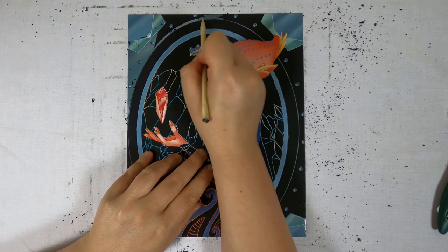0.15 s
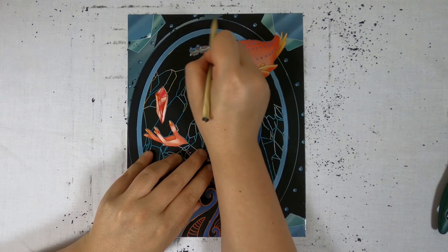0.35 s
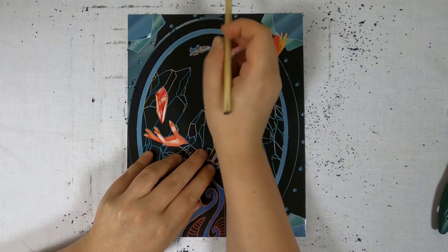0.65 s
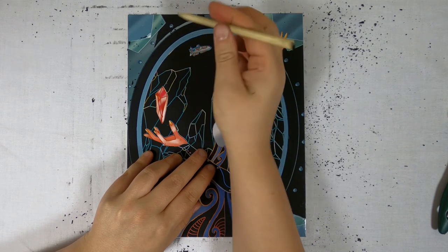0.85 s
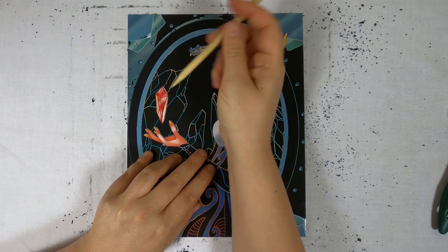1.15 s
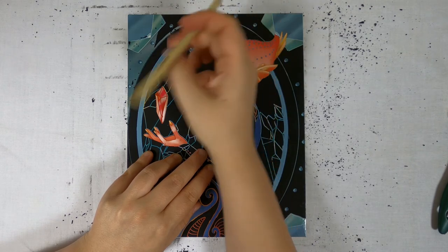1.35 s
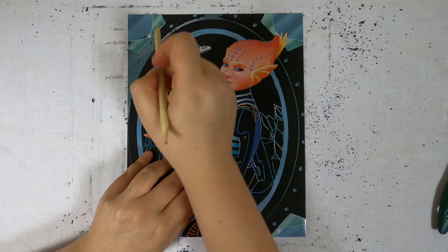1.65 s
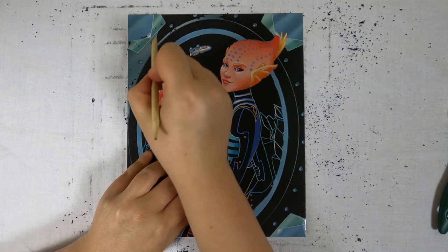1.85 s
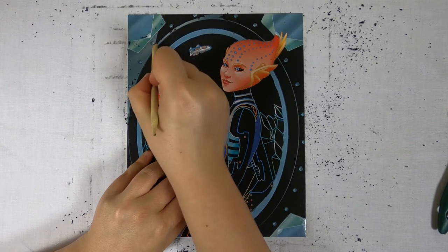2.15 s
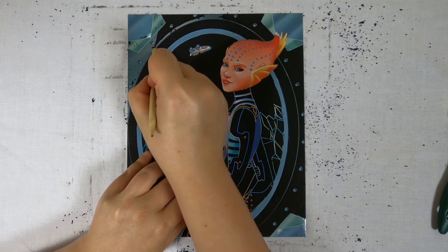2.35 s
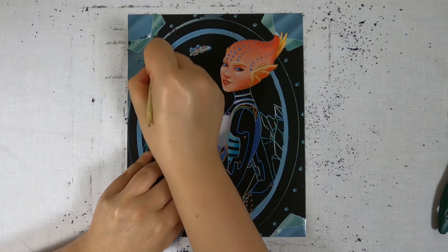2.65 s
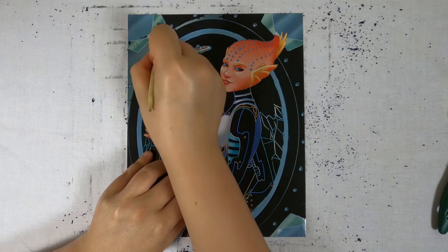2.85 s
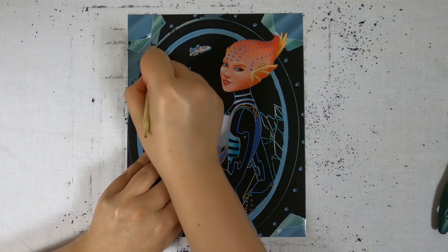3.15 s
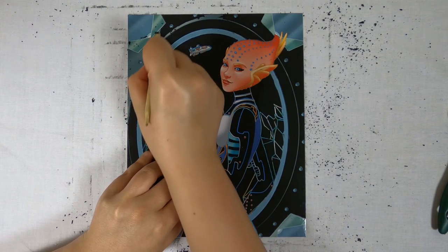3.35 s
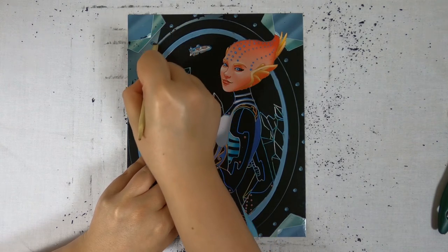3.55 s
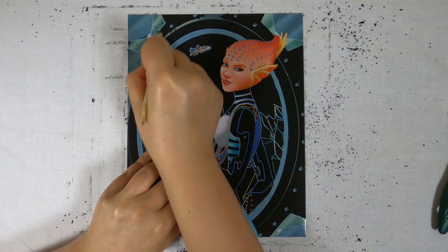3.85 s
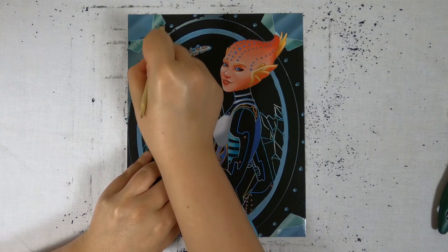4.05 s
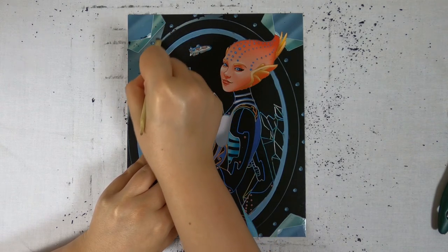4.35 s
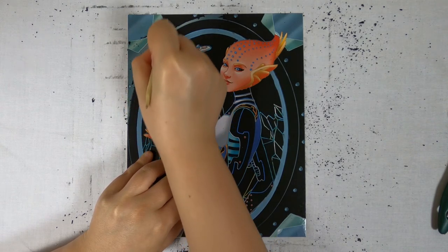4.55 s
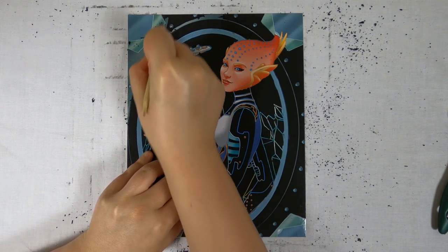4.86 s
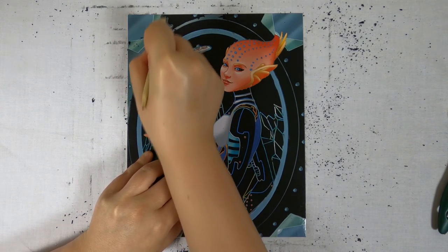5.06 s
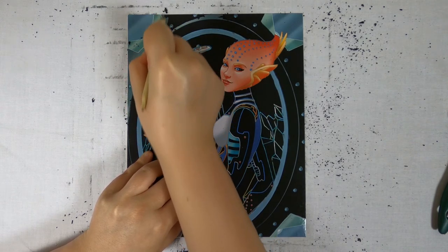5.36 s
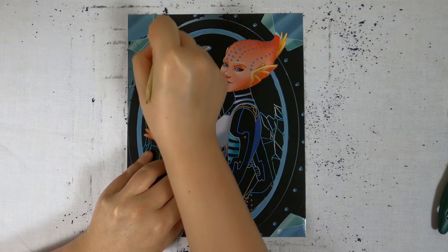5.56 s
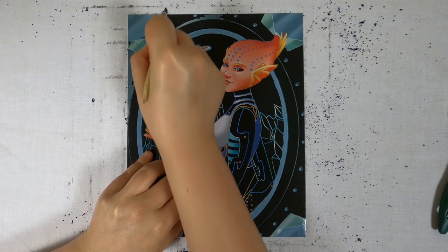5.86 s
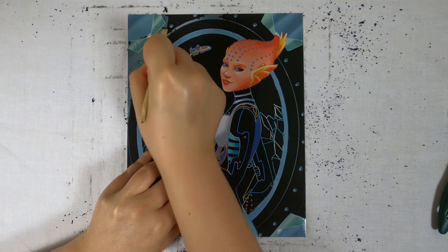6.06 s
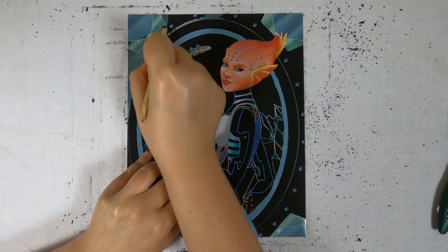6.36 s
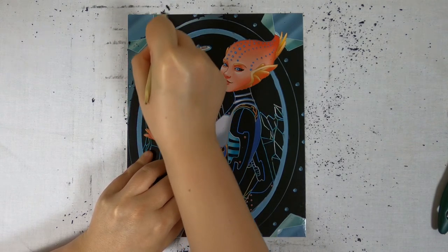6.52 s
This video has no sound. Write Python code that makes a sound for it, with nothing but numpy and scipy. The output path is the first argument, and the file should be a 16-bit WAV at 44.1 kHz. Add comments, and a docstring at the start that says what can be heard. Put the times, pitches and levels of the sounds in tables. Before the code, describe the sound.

A wooden stylus works on a scratch card, heard from close by and a little to the left, over the faint low rush of a quiet room. Two light, thin scratches come at about 0.2 and 0.4 seconds. From 0.5 to 2 seconds there is only a faint sliding of skin and the swish of the shaft shifting between fingers. The tip lands with a tick at 2.4 seconds. Three longer, much louder rasping scrapes follow at about 2.6, 3.8 and 4.5 seconds, with small clicks, fine crackle and a resonance from card and tabletop; the last two carry a brief rough squeak. From 5 to 6.3 seconds five short strokes come about three a second, then a couple of faint ones. The hand brushes to and fro over the card throughout the scraping and bumps the table softly as strokes stop, most clearly near 5 and 6 seconds.

```python
"""A quiet room, stereo microphones close to a table where a wooden stylus scrapes a scratch card.
The tip sticks and slips on the coating and sets card and tabletop ringing; the hand brushes to and fro
over the card. After two light strokes the fingers shift their grip, then come three long hard strokes
and a run of short ones, the hand bumping the table as they stop."""
import sys
import numpy as np
from scipy import signal
from scipy.fft import rfft, irfft
from scipy.io import wavfile
from scipy.ndimage import uniform_filter1d

SR = 44100
rng = np.random.default_rng(int(sys.argv[2]) if len(sys.argv) > 2 else 0)


def waveform_to_disk(signal):
    """Save audio, clipped to [-1, 1], as 16-bit WAV at the path in sys.argv[1]."""
    frames = np.transpose(np.atleast_2d(signal))
    scaled = np.clip(frames, -1, 1) * 32767
    samples = np.round(scaled).astype(np.int16)
    wavfile.write(sys.argv[1], SR, samples)


N = 295029
TIME = np.arange(N) / SR
RING_SIZE = 16384  # samples in an impulse response


def from_db(db):
    """Decibels to gain."""
    return 10 ** (np.asarray(db) / 20)


def energy_one(response):
    """Scale a stereo response so that its centre passes white noise at the same level."""
    return response / np.sqrt(np.sum(response.mean(axis=0) ** 2) + 1e-30)


def peak_one(response):
    """Scale a stereo response so that its centre peaks at 1."""
    return response / np.abs(response.mean(axis=0)).max()


def at_hz(points, hz):
    """Read a table on a log-frequency axis."""
    table = np.array(points)
    return np.interp(np.log(np.maximum(hz, 1)), np.log(table[:, 0]), table[:, 1])


def band(x, low_hz, high_hz, order=2):
    """Causal band-pass."""
    return signal.sosfilt(signal.butter(order, [low_hz, high_hz], "band", fs=SR, output="sos"), x)


def drift(per_s):
    """A random wander of spread 1 that takes a new course per_s times a second."""
    knots = rng.standard_normal(N // 20)
    return np.interp(TIME * per_s, np.arange(len(knots)), knots) * np.sqrt(3 / 2)


def minimum_phase(gain):
    """The spectrum of a causal filter with these gains: nothing sounds before its cause."""
    cepstrum = irfft(np.log(gain), RING_SIZE)
    cepstrum[1:RING_SIZE // 2] *= 2
    cepstrum[RING_SIZE // 2 + 1:] = 0
    return np.exp(rfft(cepstrum))


def colour(pair, spectrum, likeness, balance):
    """Two unrelated signals become left and right with a spectrum, likeness and balance; centre rms 1."""
    hz = np.arange(RING_SIZE // 2 + 1) * SR / RING_SIZE
    alike = np.clip(at_hz(likeness, hz), 0, .99)
    channels = []
    for sign in (1, -1):
        gain = from_db(at_hz(spectrum, hz) + sign * at_hz(balance, hz) / 2)
        filters = irfft([minimum_phase(gain * np.sqrt(share)) for share in (1 + alike, 1 - alike)])
        mid, side = signal.oaconvolve(pair, filters, axes=1)[:, :pair.shape[-1]]
        channels.append(mid + sign * side)
    return np.array(channels) / np.std(np.mean(channels, axis=0))


def play(force, response):
    """A force drives a stereo response."""
    return signal.oaconvolve(force[None], response, axes=1)[:, :N]


def blows(times_s, levels_db):
    """A force with one click for each blow."""
    force = np.zeros(N)
    force[(np.asarray(times_s) * SR).astype(int)] = from_db(levels_db)
    return force


def pressing(rows, release_db_per_s, sag_db_per_s=0, bite_s=0.013, bite_rise_db=17):
    """The gain of pushes (start_s, length_s, level_db): a quick bite, a hold that may sag, a release."""
    gain = np.zeros(N)
    for start, length, level_db in rows:
        t = TIME - start
        bite = bite_rise_db * np.minimum(t / bite_s - .5, 0)
        sag = sag_db_per_s * np.clip(t, 0, length)
        release = release_db_per_s * np.maximum(t - length, 0)
        db = level_db + bite - sag - release
        heard = db > -130
        gain[heard] = np.maximum(gain[heard], from_db(db[heard]))
    return gain


# Room tone (levels in all tables are relative): frequency_hz, level_db
AIR_SPECTRUM = [(20, -10), (35, -7.5), (60, -15), (100, -35), (135, -11), (190, -7.5), (270, -15.5),
                (400, -20.5), (750, -26.5), (1100, -23.5), (2000, -29), (4000, -37), (10000, -45),
                (15500, -47.5)]
# How alike the room is at the two microphones: frequency_hz, likeness_0_to_1
AIR_LIKENESS = [(30, 0.66), (200, 0.27), (600, 0.2), (2000, 0), (15000, 0.054)]
# Where the room tone leans: frequency_hz, left_minus_right_db
AIR_BALANCE = [(60, 0.5), (110, -2.5), (200, -2.5), (380, -7), (700, -6.5), (1290, -2), (2380, -3),
               (4400, 4.5), (8120, 1), (15000, -6)]


def room_tone(level_db):
    """The air all around the microphones: a steady, faint, low rush."""
    return from_db(level_db) * colour(rng.standard_normal((2, N)), AIR_SPECTRUM, AIR_LIKENESS, AIR_BALANCE)


# Decay of the room: frequency_hz, t60_s
ROOM_DECAY = [(120, 0.23), (320, 0.26), (900, 0.17), (2500, 0.17), (6000, 0.15), (14000, 0.23)]


def room(direct, wet_db, first_echo_s):
    """Nearby walls add a diffuse tail that dies band by band and is most alike left and right in the bass."""
    t = TIME[:RING_SIZE]
    spectrum = [(100, -10.5), (1000, 4.5), (15000, -1.5)]  # frequency_hz, level_db
    noise = colour(rng.standard_normal((2, RING_SIZE)), spectrum, AIR_LIKENESS, HAND_BALANCE)
    edges_hz = np.geomspace(80, 17000, 8)
    tail = np.zeros_like(noise)
    for low, high in zip(edges_hz, edges_hz[1:]):
        t60_s = at_hz(ROOM_DECAY, np.sqrt(low * high))
        tail += band(noise, low, high) * from_db(-60 * t / t60_s)
    tail = energy_one(tail * (t > first_echo_s))
    return direct + from_db(wet_db) * signal.oaconvolve(direct, tail, axes=1)[:, :N]


def microphones(sound, left_lag_s):
    """The lows reach the left microphone a moment later; the treble arrives from all around."""
    left, right = sound
    lows = signal.sosfilt(signal.butter(1, 3000, fs=SR, output="sos"), left)
    late_lows = np.interp(TIME - left_lag_s, TIME, lows)
    return np.array([left - lows + late_lows, right])


# How alike the hand is at the two microphones: frequency_hz, likeness_0_to_1
HAND_LIKENESS = [(100, 0.83), (600, 0.85), (1400, 0.86), (3000, 0.45), (7000, 0.47), (15000, 0.11)]
# Where the hand sits between them: frequency_hz, left_minus_right_db
HAND_BALANCE = [(380, -2.5), (1300, 3), (2400, 8.5), (4400, 10.5), (8000, 2), (15000, -4.5)]
# Dry skin on coated card: frequency_hz, level_db
SKIN_HISS = [(700, -23.5), (1500, -4), (2900, -3), (3700, 2), (4600, -0.5), (6500, -2.5), (9300, -8.5),
             (10500, -16), (13000, -17.5), (16000, -34.5)]


def friction(spectrum=SKIN_HISS, grain_db=0.0):
    """Sliding noise from where the hand is; a fast flutter in level gives it a fine grain."""
    grain = from_db(grain_db * drift(900))
    return colour(rng.standard_normal((2, N)) * grain, spectrum, HAND_LIKENESS, HAND_BALANCE)


# The lifted hand and arm sliding: time_s, level_db
ARM_SLIDE = [(0.53, -78.5), (0.738, -77.5), (0.884, -67), (0.932, -81), (1.066, -75), (1.124, -90.5),
             (1.722, -77.5), (2.1, -91)]
# The shaft slipping through the fingers: centre_s, length_s, level_db
GRIP_SLIPS = [(0.72, 0.061, -75), (1.06, 0.037, -74), (1.242, 0.038, -70), (1.452, 0.05, -69.5),
              (1.521, 0.028, -60), (1.635, 0.033, -75), (1.71, 0.053, -72.5), (1.793, 0.045, -69.5)]
# Fingers on the wooden shaft: frequency_hz, level_db
GRIP_SPECTRUM = [(1000, -22), (3300, -24), (4300, -27), (5600, -13), (6300, 5), (7100, -12), (8500, -17),
                 (9900, -6.5), (11000, -22), (16000, -25)]


def regripping(slide_db, grip_db, rustle_db):
    """The arm slides away unevenly and the shaft swishes between the fingers, whose skin rustles with it."""
    times_s, levels_db = np.transpose(ARM_SLIDE)
    arm_db = np.interp(TIME, times_s, levels_db + slide_db, left=-140, right=-140)
    slide = from_db(arm_db + 2.0 * drift(30.2))
    slipping = sum(from_db(db) * np.exp(-(2 * (TIME - centre) / length) ** 2)
                   for centre, length, db in GRIP_SLIPS)
    skin = (slide + from_db(rustle_db) * slipping) * friction(SKIN_HISS, grain_db=2.5)
    shaft = from_db(grip_db) * slipping * friction(GRIP_SPECTRUM)
    return skin + shaft


def scrubs(count, first_s, period_s, growth_db, back_s=0.13, forth_s=0.14):
    """Rows like HAND_SWEEPS for steady scrubbing: back, forth, a short rest, a little harder each time."""
    rows = []
    for k in range(count):
        start, harder_db = first_s + k * period_s, k * growth_db
        rows.append((start, back_s, -76 + harder_db, -70 + harder_db))
        rows.append((start + back_s, forth_s, -74.5 + harder_db, -65 + harder_db))
    return rows


# Single sweeps of the hand over the card: start_s, length_s, hiss_db, rub_db
HAND_SWEEPS = [(-0.02, 0.12, -81, -66), (0.13, 0.11, -79, -68.5), (0.239, 0.14, -84, -69),
               (0.419, 0.083, -68.5, -70.5), (2.475, .138, -81.5, -73), (2.58, 0.36, -75.5, -58.5),
               (2.935, 0.2, -69.5, -72.5), (3.319, 0.16, -77.5, -67.5), (3.484, .174, -80.5, -84),
               (3.736, 0.37, -79, -59.5), (4.102, 0.2, -76.5, -89), (4.394, 0.3, -71, -60.5)]
# The card answering the rubbing hand: frequency_hz, level_db
RUB_SPECTRUM = [(60, -26), (150, 9), (320, 12), (460, 6.5), (600, -4.5), (800, -5.5), (1000, 3),
                (1200, 0.5), (1370, 3.5), (1600, -0.5), (2100, -8), (2400, 2), (3000, -32), (6000, -35.5)]


def brushing(hiss_gain_db, rub_gain_db, hiss_power, rub_power, stick_share):
    """In each sweep the hand speeds up and slows down again; friction noise follows its speed."""
    hiss, rub = np.zeros((2, N))
    sweeps = HAND_SWEEPS + scrubs(count=7, first_s=4.764, period_s=0.312, growth_db=0.56)
    for start, length, hiss_db, rub_db in sweeps:
        during = (TIME > start) & (TIME < start + length)
        speed = np.abs(np.sin(np.pi * (TIME[during] - start) / length))
        sliding = np.maximum(speed - stick_share, 1e-6)  # near the turn the skin sticks and the hiss stops
        hiss[during] += from_db(hiss_db + hiss_gain_db) * sliding ** hiss_power
        rub[during] += from_db(rub_db + rub_gain_db) * speed ** rub_power
    pressure = from_db(0.85 * drift(49))
    skin = hiss * friction(SKIN_HISS, grain_db=2.0)
    body = rub * friction(RUB_SPECTRUM, grain_db=1.5)
    return pressure * (skin + body)


# Modes of card and tabletop: pitch_hz, level_db, t60_s
CARD_MODES = [(143.1, -9, 0.18), (173.4, -11, 0.21), (196.6, -9.5, 0.33), (278.5, -5.5, 0.31),
              (300.3, 1, 0.15), (337, -6, 0.096), (365.2, -5.5, 0.23), (437, -16, 0.17), (444.9, -5, 0.17),
              (543.4, -18, 0.12), (658, -16.5, 0.12), (742.4, -11.5, 0.19), (803, -18.5, 0.13),
              (932, -3.5, 0.16), (927.6, -7.5, 0.13), (982, -10, 0.12), (1024, -13, 0.17),
              (1042, -7.5, 0.13), (1118.5, -12.5, 0.1), (1179, -16.5, 0.054), (1237, -16.5, 0.045),
              (1358, -9, 0.1), (1667, -21, 0.021), (1847, -16.5, 0.14), (2046, -22, .05),
              (2422, -16.5, 0.043), (2920, -20.5, 0.033), (3560, -25, 0.016), (3608, -23, 0.048)]
# The crowd of weak modes between and above them: frequency_hz, level_db
CARD_WASH = [(60, -51), (300, -20), (600, -46), (1100, -34), (1600, -28), (2600, -31), (3200, -35.5),
             (4000, -37), (4900, -36), (5500, -40), (6500, -41.5), (9000, -51.5), (12000, -72.5),
             (16000, -54)]
# How alike the card is at the two microphones: frequency_hz, likeness_0_to_1
CARD_LIKENESS = [(100, .97), (600, .95), (1400, .82), (3000, .45), (7000, .5), (15000, .3)]
# Where the card sits, mostly to the left: frequency_hz, left_minus_right_db
CARD_BALANCE = [(60, 1), (110, 0), (200, 0.0), (380, 1.5), (700, 2), (1290, 2.5), (2380, 5.5), (4400, 11),
                (8120, 1), (15000, -8)]


def card_response(scatter_t60_s):
    """One slip cracks, then the card's modes ring on; scatter from the table differs left and right."""
    hz = np.geomspace(20, 20000, 3000)
    power = from_db(at_hz(CARD_WASH, hz)) ** 2
    for pitch_hz, level_db, t60_s in CARD_MODES:
        q = np.pi * pitch_hz * t60_s / np.log(1000)
        ratio = hz / pitch_hz
        power += from_db(level_db) ** 2 / (q ** 2 * (1 - ratio ** 2) ** 2 + ratio ** 2)
    spectrum = np.column_stack([hz, 10 * np.log10(power)])
    scatter = rng.standard_normal(RING_SIZE) * from_db(-60 * TIME[:RING_SIZE] / scatter_t60_s)
    pair = np.array([signal.unit_impulse(RING_SIZE), scatter / np.linalg.norm(scatter)])
    return colour(pair, spectrum, CARD_LIKENESS, CARD_BALANCE)


# The hand bumps the table, mostly as a stroke stops: time_s, peak_db
HAND_BUMPS = [(1.406, -53.5), (3.878, -33), (4.644, -43.5), (5.005, -25), (5.331, -38), (5.636, -40.5),
              (5.949, -27), (6.27, -33.5), (6.291, -35.5)]


def bumps(card, gain_db, soft_hz, lead_s):
    """The soft side of the hand wakes only the lowest table modes, which swell just after it touches."""
    times_s, peaks_db = np.transpose(HAND_BUMPS)
    low_modes = band(card, 92, soft_hz)
    thud = peak_one(band(low_modes, 104, 420, order=1))
    return from_db(gain_db) * play(blows(times_s - lead_s, peaks_db), thud)


# The tip lands or snags: time_s, knock_db, snap_db
TIP_TAPS = [(0.655, -60, -59.5), (2.422, -40.5, -44.5), (2.721, -28, -53), (2.77, -30, -52),
            (3.834, -55, -55), (2.8, -31, -46), (3.202, -55.5, -62), (3.91, -27, -49), (4.597, -32, -43),
            (4.825, -83, -60), (6.251, -42, -62)]


def taps(card, knock_gain_db, snap_gain_db, stylus_hz, stylus_t60_s, ring_db):
    """The hard tip knocks on the card; the stylus itself snaps and rings briefly."""
    times_s, knock_db, snap_db = np.transpose(TIP_TAPS)
    t = TIME[:RING_SIZE]
    knock = play(blows(times_s, knock_db + knock_gain_db), peak_one(band(card, 140, 2100)))
    burst = rng.standard_normal((2, RING_SIZE)) * from_db(-60 * t / 0.017)
    crack = peak_one(band(burst, 3060, 5640))
    ring = np.sin(2 * np.pi * stylus_hz * t) * from_db(ring_db - 60 * t / stylus_t60_s)
    snap = play(blows(times_s, snap_db + snap_gain_db), peak_one(crack + ring))
    return knock + snap


# The two light opening strokes: start_s, length_s, level_db
TIP_FLICKS = [(0.159, 0.019, -53), (0.431, 0.04, -54.5)]
# A tip that only grazes the coating: frequency_hz, level_db
FLICK_SPECTRUM = [(200, -27), (550, -3), (850, -12), (1150, -1), (1650, 3.5), (1900, -8), (2400, 2.5),
                  (2700, -14), (2950, 1), (3400, -9.5), (6000, -10.5), (9000, -28), (12500, -24.5),
                  (16000, -31)]


def flicking(gain_db):
    """A grazing tip sheds fine dust with a thin rasp and leaves the low modes still."""
    envelope = pressing(TIP_FLICKS, release_db_per_s=400)
    flutter = from_db(gain_db + 2.0 * drift(183))
    return envelope * flutter * friction(FLICK_SPECTRUM)


# The tip locks onto a strong mode of the card: start_s, length_s, level_db
TIP_CHATTERS = [(3.89, 0.062, -31), (4.535, 0.087, -37.5)]


def chatter(gain_db, pitch_hz, wobble_hz):
    """Slips fall into step with the card for a moment: a rough, wavering note."""
    phase = 2 * np.pi * np.cumsum(pitch_hz + wobble_hz * drift(120)) / SR
    sides = from_db(np.array([[1], [-1]]) * at_hz(CARD_BALANCE, pitch_hz) / 2)
    envelope = pressing(TIP_CHATTERS, release_db_per_s=702)
    flutter = from_db(gain_db + 2.0 * drift(200))
    return sides * envelope * flutter * np.sqrt(2) * np.sin(phase)


def running_rms(x, samples):
    """The level of x over a sliding window."""
    return np.sqrt(uniform_filter1d(x ** 2, size=samples) + 1e-9)


def slips(per_s, spread_db, clump_db, smooth_share):
    """Stick and slip: clumps of tiny jolts of uneven size over smooth friction; rms 1."""
    sizes = from_db(spread_db * np.minimum(rng.exponential(1, N), 4)) * rng.choice([-1, 1], N)
    jolts = sizes * (rng.random(N) < per_s / SR)
    jolts /= np.sqrt(np.mean(jolts ** 2))
    smooth = smooth_share * rng.standard_normal(N)
    force = (jolts + smooth) * from_db(clump_db * drift(220))
    return force / running_rms(force, 1300)


def edge_echo(force, delay_s, wander, share):
    """The shudder returns from the card's edge; as the tip travels, delay and colour wander."""
    lag_s = delay_s * np.exp(wander * drift(14))
    echo = np.interp(TIME - lag_s, TIME, force)
    return (force + share * echo) / np.hypot(1, share)


# Pushes of the tip; a long stroke is a light drag and then a few harder pushes:
# start_s, length_s, judder_db, scrape_db, crackle_db
TIP_PUSHES = [(2.559, .03, -49, -65, -83), (2.595, 0.063, -40, -53.5, -87), (2.636, 0.13, -33, -42, -61),
              (2.765, 0.053, -49, -34.5, -54), (3.789, 0.05, -42, -51, -73.5),
              (3.867, .015, -35.5, -41.5, -63), (3.886, 0.058, -41.5, -34, -55.5),
              (3.957, 0.065, -36.5, -38, -61.5), (4.436, .045, -47.5, -53, -68.5),
              (4.475, 0.149, -45, -35.5, -57), (4.621, 0.039, -39, -41, -66),
              (4.976, 0.035, -47.5, -40.5, -54), (5.319, 0.017, -52.5, -58, -91),
              (5.604, 0.038, -45, -43.5, -63), (5.914, 0.031, -47, -42.5, -63),
              (6.252, 0.03, -47, -43.5, -65.5), (6.556, 0.017, -64, -55, -86),
              (6.646, 0.0068, -76, -57.5, -83)]


def scraping(card, judder_db, scrape_db, rasp_db, crackle_db, lead_s, judder_lag_s):
    """The tip judders the tabletop as it drags and rings the card as it bites; flaking coating crackles."""
    start, length, judders, scrapes, crackles = np.transpose(TIP_PUSHES)
    start = start - lead_s  # the modes take a moment to swell, so the push comes just ahead
    force = slips(per_s=2300, spread_db=4.0, clump_db=1.93, smooth_share=0.81)
    force = edge_echo(force, delay_s=0.002, wander=0.4, share=0.35)
    # as the tip slows the sound dulls: judder comes late and lingers, crackle fades first
    dragging = pressing(zip(start + judder_lag_s, length, judders), release_db_per_s=332)
    biting = pressing(zip(start, length, scrapes), release_db_per_s=420)
    flaking = pressing(zip(start, length, crackles), release_db_per_s=746, sag_db_per_s=26)
    judder = play(force * dragging, energy_one(band(card, 141.7, 538, order=5)))
    scrape = play(force * biting, energy_one(band(card, 460, 5270, order=3)))
    # coating tears away in coarser jolts of its own
    tears = slips(per_s=900, spread_db=4.0, clump_db=2.0, smooth_share=0.3)
    rasp = play(tears * flaking, energy_one(band(card, 1370, 4800, order=3)))
    # every slip sheds a little shower of flakes
    flakes = rng.standard_normal(N) * running_rms(force, 48)
    crackle = play(flakes * flaking, energy_one(band(card, 3550, 14000, order=4)))
    return (from_db(judder_db) * judder + from_db(scrape_db) * scrape
            + from_db(rasp_db) * rasp + from_db(crackle_db) * crackle)


def scene():
    """Stylus and hand close to the microphones, the quiet room behind them."""
    card = card_response(scatter_t60_s=0.059)
    stylus = scraping(card, judder_db=-0.5, scrape_db=-2.0, rasp_db=8.5, crackle_db=5.04,
                      lead_s=0.0035, judder_lag_s=0.0042)
    stylus += chatter(gain_db=-5.0, pitch_hz=930, wobble_hz=27.96)
    stylus += flicking(gain_db=0.1)
    stylus += taps(card, knock_gain_db=-1.0, snap_gain_db=3.5,
                   stylus_hz=4120, stylus_t60_s=0.03, ring_db=-5)
    hand = bumps(card, gain_db=-4.5, soft_hz=184, lead_s=0.00081)
    hand += brushing(hiss_gain_db=8.5, rub_gain_db=1.5, hiss_power=0.52, rub_power=1.24, stick_share=0.074)
    hand += regripping(slide_db=3.0, grip_db=1.0, rustle_db=-11.5)
    direct = microphones(stylus + hand, left_lag_s=4.5e-5)
    return room_tone(level_db=-69) + room(direct, wet_db=-11.0, first_echo_s=0.0036)


def record(dry):
    """The microphones roll off gently at the top, then the top is cut steeply."""
    roll_off = signal.butter(2, 14500, fs=SR, output="sos")
    steep_cut = signal.ellip(10, .1, 70, 15600, fs=SR, output="sos")
    return signal.sosfilt(steep_cut, signal.sosfilt(roll_off, dry))


dry = scene()
out = record(dry)
waveform_to_disk(out)
```